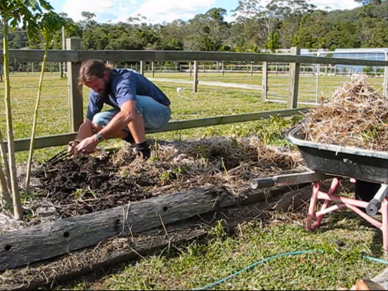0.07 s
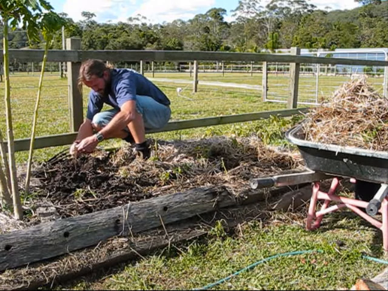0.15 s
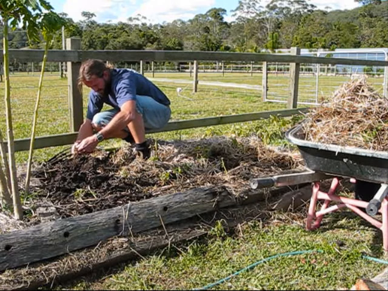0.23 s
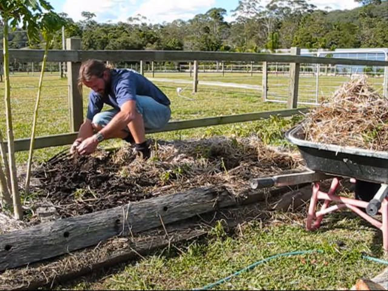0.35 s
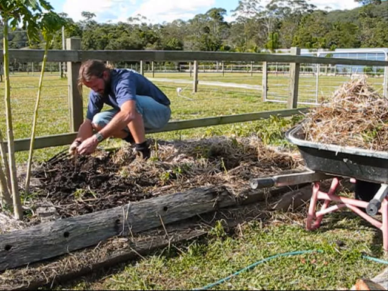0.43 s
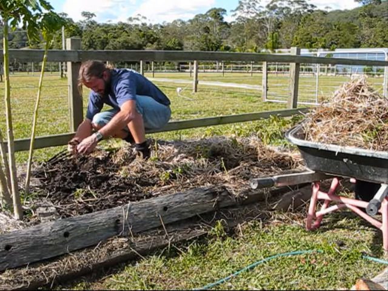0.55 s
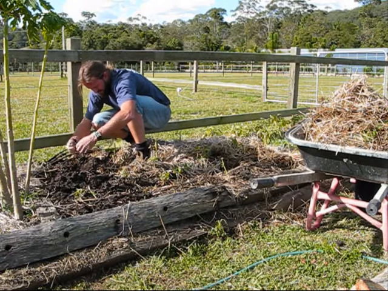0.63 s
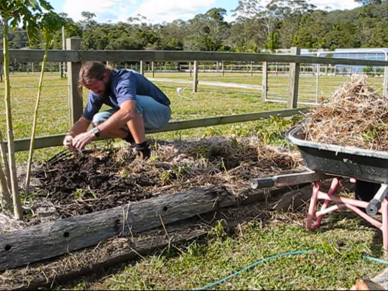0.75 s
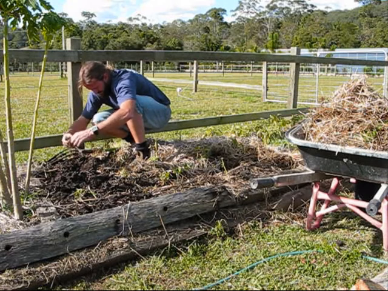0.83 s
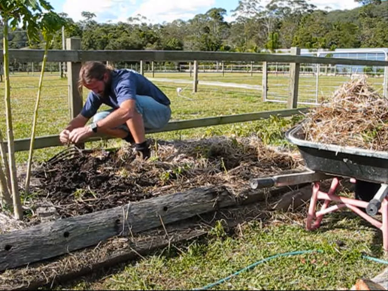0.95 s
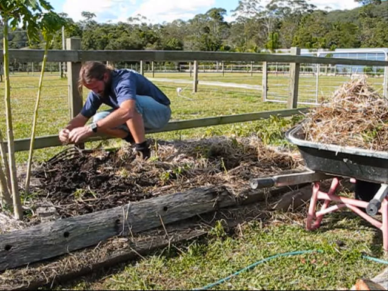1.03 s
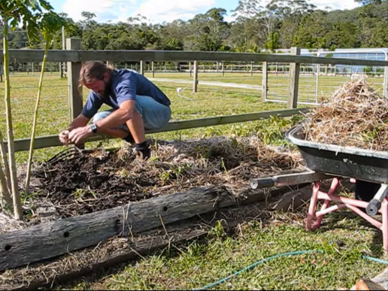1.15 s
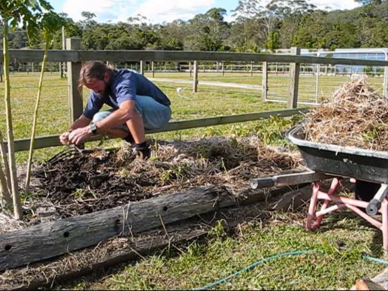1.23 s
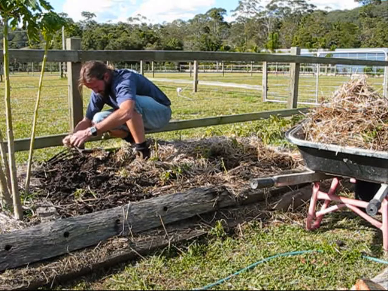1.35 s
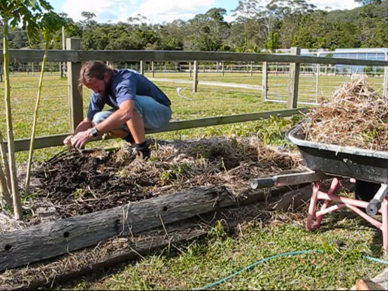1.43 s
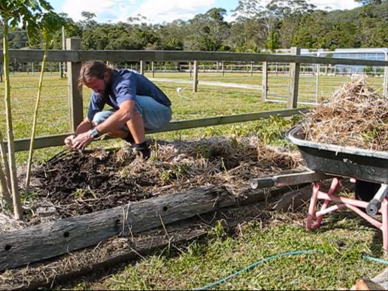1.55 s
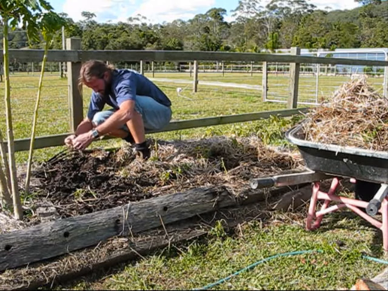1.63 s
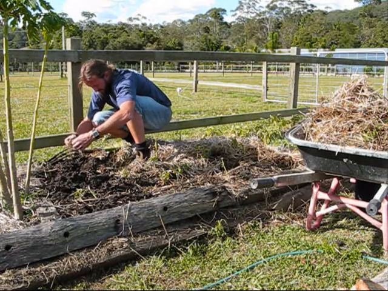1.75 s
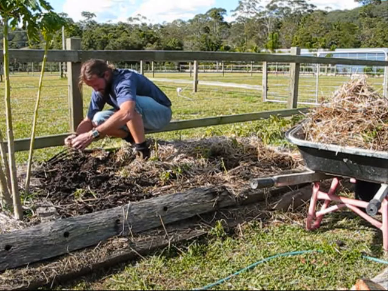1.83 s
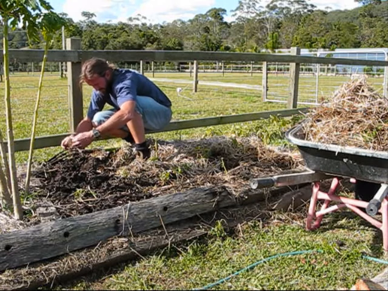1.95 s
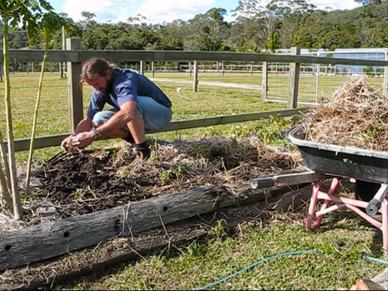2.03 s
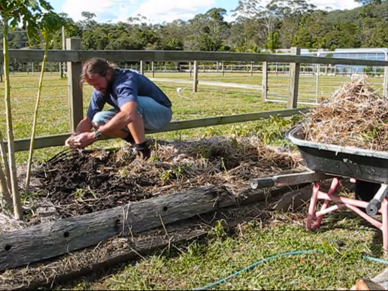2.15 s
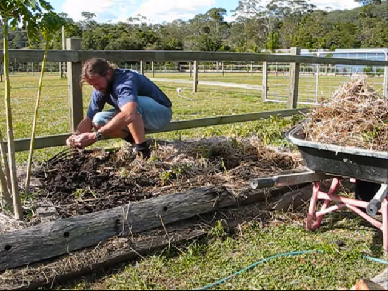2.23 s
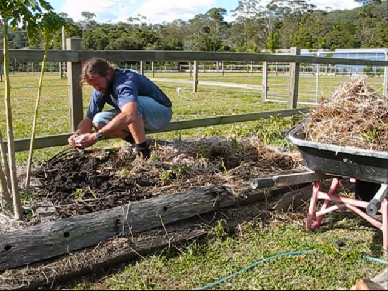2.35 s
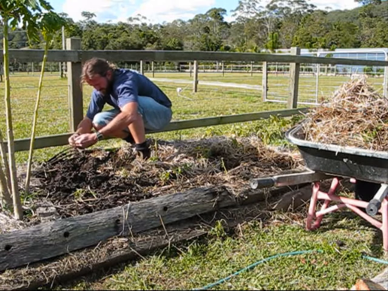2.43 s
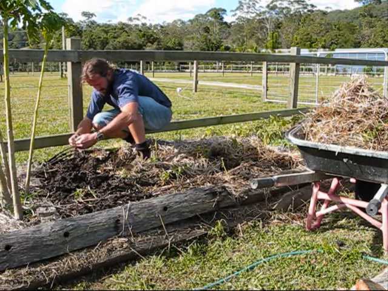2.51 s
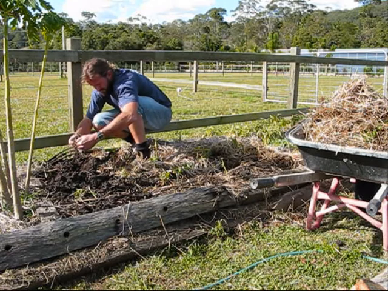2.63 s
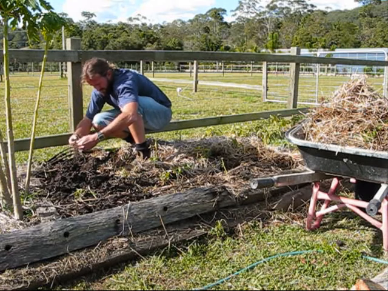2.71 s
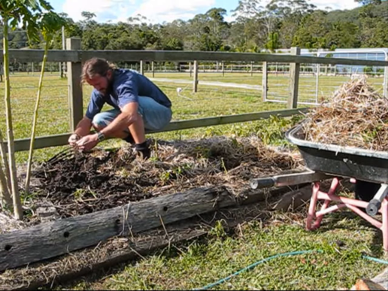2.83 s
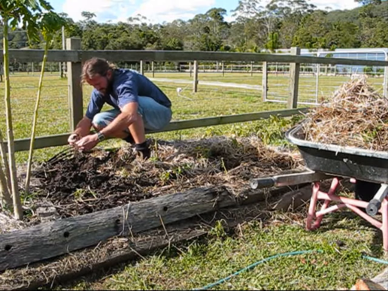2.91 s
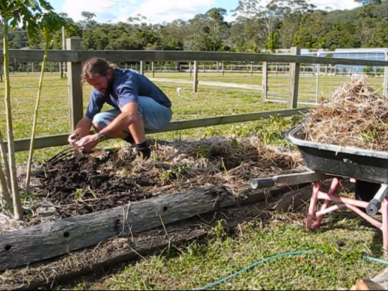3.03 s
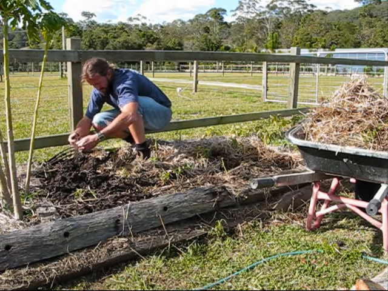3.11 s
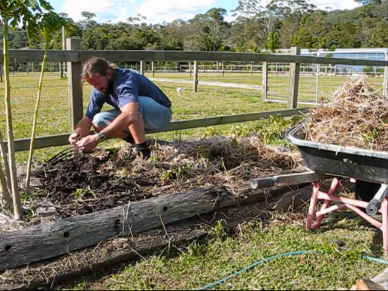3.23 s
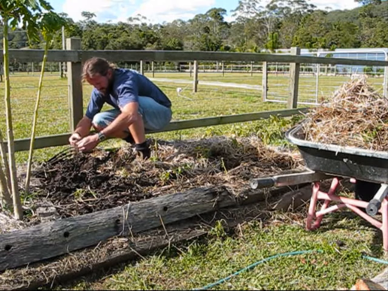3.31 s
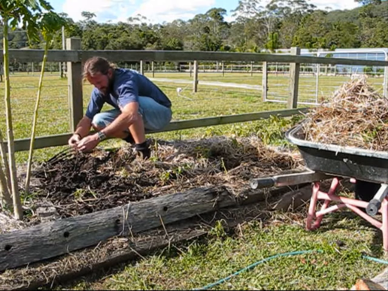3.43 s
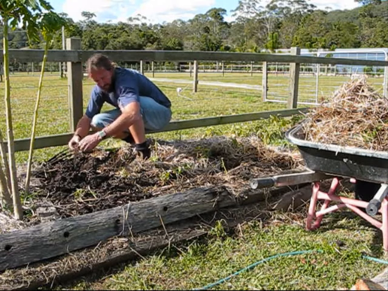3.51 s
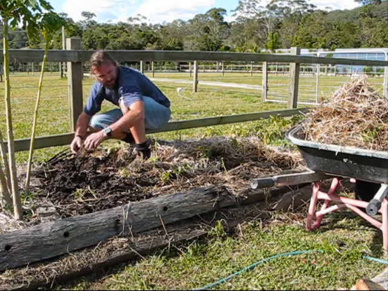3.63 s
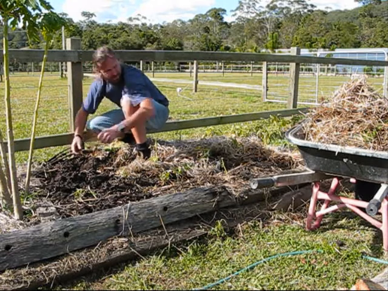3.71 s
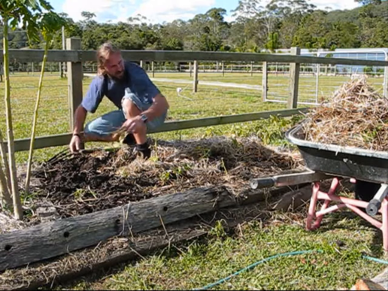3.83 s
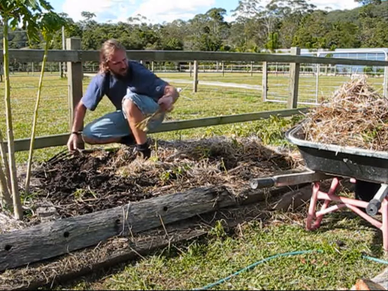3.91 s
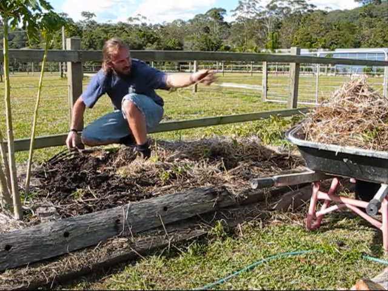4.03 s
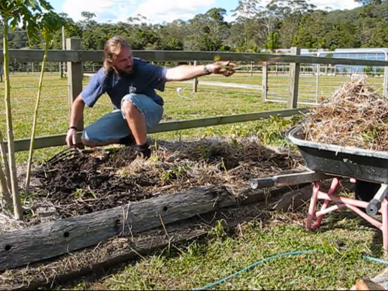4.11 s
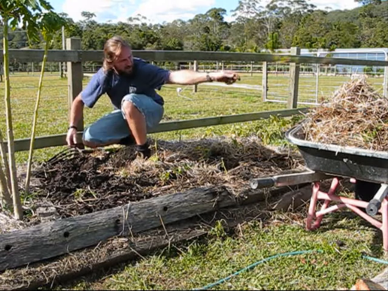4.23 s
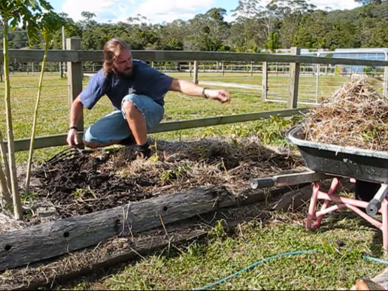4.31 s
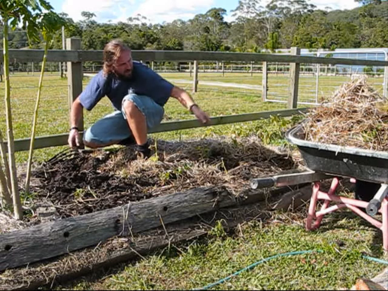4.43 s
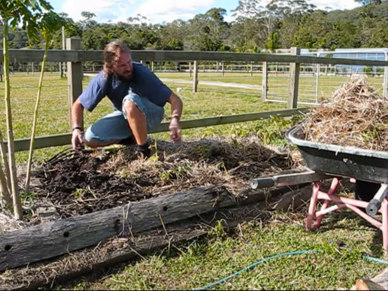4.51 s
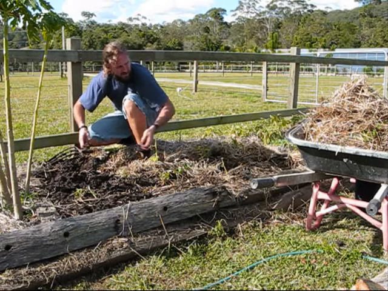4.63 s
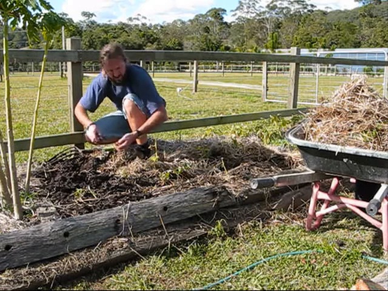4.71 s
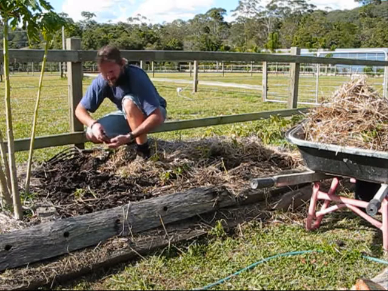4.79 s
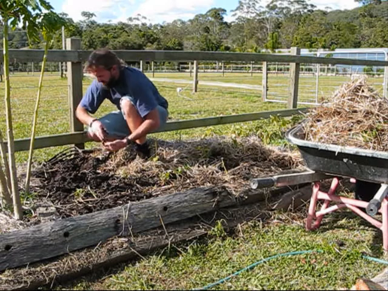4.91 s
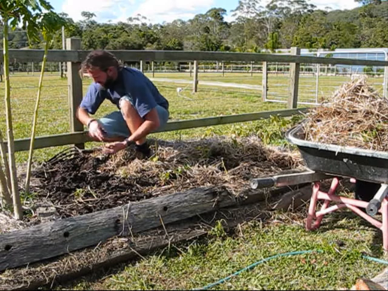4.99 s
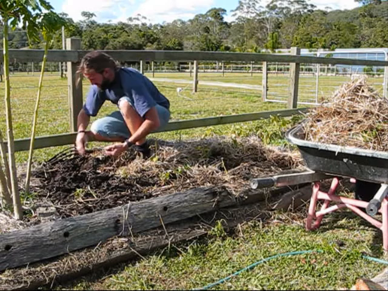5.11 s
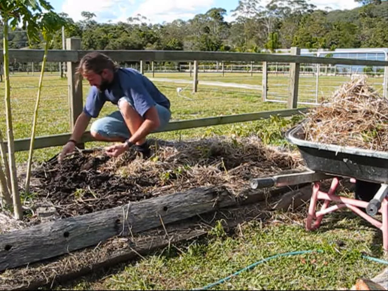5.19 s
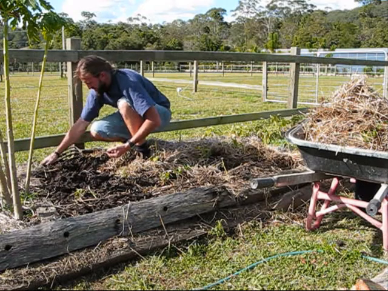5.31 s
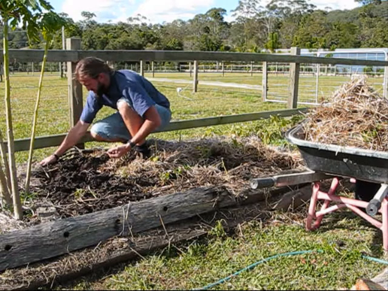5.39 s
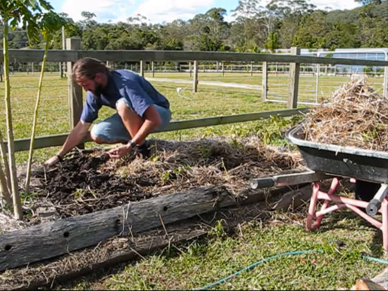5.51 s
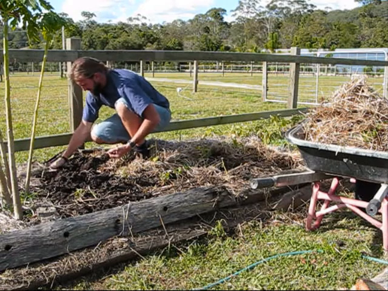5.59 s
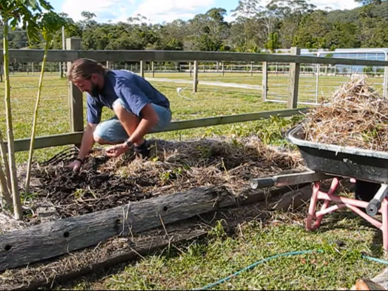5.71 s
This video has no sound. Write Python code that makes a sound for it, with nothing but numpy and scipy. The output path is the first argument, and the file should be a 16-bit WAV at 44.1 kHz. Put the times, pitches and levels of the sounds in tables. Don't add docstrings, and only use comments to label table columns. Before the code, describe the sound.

Dry straw rustles and stalks snap in working hands; a thrown handful lands with a loud crackle over open-air hiss, cicada drone and a brief parrot squeak.

```python
import sys
import numpy as np
from scipy import signal
from scipy.fft import rfft, irfft, next_fast_len
from scipy.io import wavfile
from scipy.ndimage import map_coordinates

SR = 44100
rng = np.random.default_rng(int(sys.argv[2]) if len(sys.argv) > 2 else 0)


def gain_from_db(level_db):
    decades = np.asarray(level_db, float) / 20
    return 10 ** decades


def transcribe(u):
    v = np.clip(np.atleast_2d(u).T, -1, 1)
    q = np.round(v * 32767).astype(np.int16)
    wavfile.write(sys.argv[1], SR, q)


N = 253575

# frequency in Hz, level in dB per Hz.
AIR_SPECTRUM = [(15, -35), (25, -6.5), (70, -3.5), (300, -3.5), (700, -3), (1200, -5.5), (2000, -8),
                (4500, -13), (7300, -15.5), (7800, -14), (9200, -14), (9900, -18.5), (13000, -22.5),
                (16500, -25)]
AIR_DB = -48
HUM_HZ, HUM_DB = 82, -67.5

# start in seconds, second wind in seconds, cut in seconds,
# belly level in dB, level in dB of the neighbours left after the cut.
CICADA_PHRASES = [
    (-.05, .75, 1.24, -57, -72),
    (1.7, 2.7, 2.963, -59, -63),
    (3.9, 4.8, 5.243, -60, -64),
    (5.75, 6.6, 7, -59, -65),
]
DRUM_LOW_HZ, DRUM_HIGH_HZ, DRUM_AFTER_HZ = 8100, 8690, 8480
CLIMB = .75
FRESH_PER_S, TIRED_PER_S, SPENT_PER_S = 125, 114, 106
RECOVER_S = .22
DRUM_START_DB, SWELL_DB, DRUM_DB = -72, -61, -54
SWELL_SHARE = .38
BELLY_HZ, BELLY_START_DB = 7880, -5

# frequency in Hz, level in dB per Hz.
CHAFF_SPECTRUM = [(5000, -33), (8000, -5.5), (11000, -2), (13500, 0.5), (15200, -1.5), (16500, -8)]
# frequency in Hz, level in dB per Hz.
STALK_SPECTRUM = [(600, -40), (1300, -10.5), (2600, -1.5), (5000, 0), (7500, -1.5), (11000, -32)]
# peak in seconds, level in dB, seconds to rise 10 dB,
# seconds to fall 10 dB, coarse stalks over fine chaff in dB.
HAND_STROKES = [(.3, -68, 1, 1, -8), (1.45, -69, .2, .4, -6), (2.05, -64, .4, .25, -10),
                (2.8, -68, .8, .7, -11), (3.63, -55, .09, .6, -.5), (3.92, -54, .25, .25, -2),
                (4.34, -57, .12, .2, -4), (4.47, -39, .012, .04, -7), (4.507, -31.5, .04, .078, -6.8),
                (4.65, -43, .07, .11, -6.5), (4.7505, -36.5, .002, .009, -5), (4.85, -48, .15, .2, -6.5),
                (5.2, -57, .3, .2, -3), (5.46, -49.5, .09, .12, -4), (5.57, -55, .1, .1, -4),
                (5.7, -42.5, .085, .08, -7)]
FALL_SHAPE = 1.4

# start in seconds, peak in dB, body over peak in dB.
STALK_SNAPS = [(0.0417, -41, -8), (0.3131, -43, -13), (0.9222, -45, -5), (1.4166, -37, -16),
               (1.5029, -35, -8), (1.5854, -45, -10), (1.7992, -38, -13), (1.9633, -42, -8),
               (1.9963, -36.5, -15), (2.0841, -45, -9), (2.134, -34, -12), (3.5955, -32, -17),
               (3.7703, -40, -7), (3.8144, -37, -9), (3.9468, -30, -3.5), (4.1658, -41, -7),
               (4.329, -39, -12),
               (4.4507, -32, -12), (4.4645, -23, -10), (4.481, -28, -7), (4.5004, -27, -18),
                (4.5064, -19, -13), (4.5504, -20, -14), (4.5652, -13.5, -4.5), (4.569, -25, -4),
                (4.5754, -29, -12), (4.591, -26, -9), (4.6107, -15.5, -12), (4.9754, -40, -3),
                (5.0566, -36, -9), (5.0876, -39, -12), (5.1012, -32, -15), (5.1576, -38, -7),
                (5.2299, -40, -7), (5.2903, -39, -12), (5.3831, -41, -8), (5.405, -31, -15),
                (5.428, -38, -13), (5.4502, -25.5, -10), (5.5094, -41, -5), (5.5313, -38, -5),
                (5.675, -31, -14)]
SNAP_T60_S = .011
THICK_DB, THICK_RINGS = -19, .05

# frequency in Hz, gain in dB.
THROAT = [(1500, -34), (2000, -2.5), (2700, -1), (3600, -2), (5300, 0.5), (6500, -12), (7500, -22),
          (10500, -13), (12300, -28), (13500, -21), (15500, -34)]
# start in seconds, length in seconds, from Hz, to Hz, level in dB.
CLEAR_SYLLABLES = [
    (0.465, .018, 2040, 2190, -44),
    (.482, .019, 2210, 2420, -39.5),
    (0.607, 0.0228, 2177, 1976, -41.5),
    (0.629, .017, 1990, 2014, -44),
    (.645, 0.011, 2040, 2100, -48),
]
# start in seconds, length in seconds, from Hz, to Hz, level in dB.
HUSKY_SYLLABLES = [
    (0.429, .022, 2400, 2400, -50),
    (0.446, 0.021, 2340, 2050, -47),
    (0.548, 0.0038, 2540, 2740, -34),
    (0.572, 0.0197, 2330, 2346, -40),
    (0.589, 0.015, 3310, 3340, -41),
]
# start in seconds, length in seconds, from Hz, to Hz, level in dB.
HARSH_SYLLABLES = [
    (.5225, 0.0085, 2800, 2790, -37),
    (0.5532, 0.0046, 2640, 2760, -32.5),
    (0.5577, 0.0077, 2760, 2690, -35),
    (0.563, .009, 2650, 2560, -36.5),
]
# start in seconds, length in seconds, from Hz, to Hz, level in dB.
BROKEN_SYLLABLES = [
    (.572, .012, 3500, 3200, -44),
    (0.599, 0.015, 2500, 2180, -41.5),
]
RASP = (.15, .32, .42, .9)
# frequency in Hz, level in dB.
BUZZ_PARTIALS = [(2681, -54), (3585, -41), (4490, -42), (5378, -52), (6277, -56), (8947, -63), (9857, -60),
                 (10745, -58), (11649, -60), (14300, -66)]
BUZZ_START_S, BUZZ_LENGTH_S = .498, 0.029

# start in seconds, length in seconds, from Hz, to Hz, level in dB.
HOOKS = [
    (2.329, .095, 5400, 4680, -60.5),
    (2.685, .095, 5550, 5150, -60),
    (3.07, .06, 4600, 4500, -65),
    (5.405, 0.095, 5300, 4900, -57.5),
]
# start in
# seconds, length in seconds, from Hz, to Hz, level in dB.
GLIDES = [(.83, .03, 1800, 2480, -60), (0.856, .075, 2540, 2080, -54.5), (4.165, .012, 4200, 3900, -55),
          (4.974, 0.0074, 5150, 4150, -49), (5.155, .02, 4200, 4210, -58), (5.174, .026, 2980, 3800, -50),
          (5.195, .017, 4400, 4250, -51), (5.208, 0.039, 3195, 3800, -52), (5.243, .03, 4520, 4760, -63),
          (5.493, 0.026, 2220, 2140, -56.5), (3.69, .03, 2300, 3900, -60)]
HOOK_HALFWAY, GLIDE_HALFWAY = 1.25, .48

MIC_TOP_HZ = 15780


def unit(x):
    return x / np.sqrt(np.mean(x ** 2) + 1e-20)


def curves(rows):
    s, *columns = np.transpose(rows)
    return [np.interp(np.arange(N) / SR, s, column) for column in columns]


def gain(points, hz):
    f, db = np.transpose(points)
    return gain_from_db(np.interp(np.log(hz + 1), np.log(f), db))


def noise(points):
    m = next_fast_len(N + 8192)
    spectrum = rfft(rng.standard_normal(m)) * gain(points, np.fft.rfftfreq(m, 1 / SR))
    return unit(irfft(spectrum, m)[:N])


def wobble(rate):
    knots = rng.standard_normal(int(N * rate / SR) + 4)
    return map_coordinates(knots, [np.arange(N) * rate / SR])


def tone(hz):
    return np.sin(np.cumsum(2 * np.pi * hz / SR))


def add(track, s, sound):
    part = track[round(s * SR):][:len(sound)]
    part += sound[:len(part)]


def air():
    hum = tone(HUM_HZ * (1 + 0.0304 * wobble(6)))
    hiss_gain = gain_from_db(AIR_DB + 0.31 * wobble(1.47) + 0.15 * wobble(8))
    hum_gain = gain_from_db(HUM_DB + 1.5 + 1.6 * wobble(3.96))
    return hiss_gain * noise(AIR_SPECTRUM) + hum_gain * hum


def phrases():
    pitch, pace, level = [], [], []
    for start, wind, cut, belly_db, after_db in CICADA_PHRASES:
        length, gone = cut - start, cut + .007
        for u in np.linspace(0, 1, 6):
            pitch.append((start + u * length, DRUM_LOW_HZ + (DRUM_HIGH_HZ - DRUM_LOW_HZ) * u ** CLIMB))
        pitch.append((gone, DRUM_AFTER_HZ))
        pace += [(start, FRESH_PER_S), (wind - RECOVER_S, TIRED_PER_S)]
        pace += [(wind, FRESH_PER_S), (cut, SPENT_PER_S)]
        level += [(start, DRUM_START_DB, belly_db + BELLY_START_DB),
                  (start + SWELL_SHARE * length, SWELL_DB, belly_db),
                  (cut, DRUM_DB, after_db + 1.5),
                  (gone, after_db, after_db - 4)]
    return curves(pitch) + curves(pace) + curves(level)


def cicada():
    hz, rate, drum_db, belly_db = phrases()
    beat = np.cumsum(rate * (1 + 0.018 * wobble(25)) / SR) % 1
    pulse = np.sin(np.pi * np.clip(beat / .8, 0, 1) ** .75) ** 1.2
    drum = tone(hz * (1 + .11 * (.35 - beat) + .003 * wobble(120)))
    belly = noise([(BELLY_HZ - 500, -30), (BELLY_HZ - 150, 0), (BELLY_HZ + 200, 0), (BELLY_HZ + 600, -30)])
    drumming = gain_from_db(drum_db + 1.6 * wobble(60)) * unit(pulse * drum)
    return drumming + gain_from_db(belly_db) * unit((pulse + 0.37) * belly)


def strokes():
    s, db, rise, fall, stalk_db = np.transpose(HAND_STROKES)[..., None]
    late = np.arange(N) / SR - s
    swell_db = 10 * (np.maximum(-late, 0) / rise) ** 2
    fade_db = 10 * (np.maximum(late, 0) / fall) ** FALL_SHAPE
    power = gain_from_db(db - swell_db - fade_db) ** 2
    return np.sqrt(power.sum(axis=0)), np.sqrt((power * gain_from_db(stalk_db) ** 2).sum(axis=0))


def crackle(per_s, spread_db, t60):
    sizes = gain_from_db(spread_db * np.minimum(rng.exponential(size=N), 4))
    hits = (rng.random(N) < per_s / SR) * sizes
    power = signal.lfilter([1], [1, -gain_from_db(-120 / (t60 * SR))], hits ** 2)
    return unit(np.sqrt(power + 0.78))


def straw():
    chaff, stalk = strokes()
    cracks = crackle(per_s=900, spread_db=2.6, t60=.004)
    return cracks * (chaff * noise(CHAFF_SPECTRUM) + stalk * noise(STALK_SPECTRUM))


def snaps():
    fine, body, t = np.zeros(N), np.zeros(N), np.arange(SR // 10) / SR
    for s, db, body_db in (*STALK_SNAPS,):
        t60 = SNAP_T60_S * (1 + THICK_RINGS * gain_from_db(db + body_db - THICK_DB))
        rise = 1 - np.exp(-(t / (0.06 * t60)) ** 2)
        add(fine, s, gain_from_db(db - 1.0 - 60 * t / t60) * rise)
        add(body, s, gain_from_db(db + 1 + body_db - 60 * t / (1.62 * t60)) * rise)
    return fine * noise(CHAFF_SPECTRUM) + body * noise(STALK_SPECTRUM)


def syllable(length, hz0, hz1, db, rasp, shake, flutter):
    u = np.linspace(0, 1, length)
    hz = (hz0 + (hz1 - hz0) * u) * (1 + 0.095 * rasp * shake)
    phase = np.cumsum(2 * np.pi * hz / SR)
    bright_db = 0.12 * (db + 41)
    stack = np.zeros(length)
    for k in range(2, int(46000 / hz0)):
        strength = (.9 * rasp if k % 3 else 1) * gain_from_db(bright_db * k)
        stack += strength * gain(THROAT, k * hz / 3) * np.sin(k * phase / 3 + k * k)
    return gain_from_db(db + 4.1 * rasp * flutter) * unit(stack) * np.clip(9 * u * (1 - u), 0, 1)


def parrot_buzz():
    t = np.arange(round(BUZZ_LENGTH_S * SR)) / SR
    u = t / t[-1]
    drift = np.cumsum(1 + .012 * wobble(200)[:len(t)]) / SR
    buzz = np.zeros(len(t))
    for k, (hz, db) in enumerate(BUZZ_PARTIALS):
        flutter = gain_from_db(2.5 * wobble(150)[:len(t)])
        buzz += gain_from_db(db + 3.5) * flutter * np.sin(2 * np.pi * hz * drift + k * k)
    return buzz * np.clip(7 * u * (1 - u), 0, 1)


def parrot():
    out, shake, flutter = np.zeros(N), wobble(900), wobble(500)
    voices = (CLEAR_SYLLABLES, HUSKY_SYLLABLES, HARSH_SYLLABLES, BROKEN_SYLLABLES)
    for voice, rasp in zip(voices, RASP):
        for s, length_s, hz0, hz1, db in voice:
            start, length = round(s * SR), round(length_s * SR)
            here = slice(start, start + length)
            add(out, s, syllable(length, hz0, hz1, db, rasp, shake[here], flutter[here]))
    add(out, BUZZ_START_S, parrot_buzz())
    return out


def far_birds():
    out, quaver = np.zeros(N), 1 + .006 * wobble(300)
    for calls, halfway in ((HOOKS, HOOK_HALFWAY), (GLIDES, GLIDE_HALFWAY)):
        for s, length, hz0, hz2, db in calls:
            hz1 = hz0 + halfway * (hz2 - hz0)
            u = np.linspace(-1, 1, round(length * SR))
            hz = hz1 + (hz2 - hz0) / 2 * u + ((hz0 + hz2) / 2 - hz1) * u ** 2
            whistle = tone(hz * quaver[round(s * SR):][:len(u)])
            add(out, s, gain_from_db(db + 4.0) * whistle * np.sqrt(1 - u ** 2))
    return out * gain_from_db(1.8 * wobble(90))


def garden(x):
    t = np.arange(SR // 5) / SR
    tail = rng.standard_normal(len(t)) * gain_from_db(-60 * t / 0.14) * (t > .003)
    return signal.fftconvolve(x, tail / np.linalg.norm(tail))[:N]


def scene():
    scattered = parrot() + far_birds() + snaps()
    mono = scattered + gain_from_db(-9) * garden(scattered) + straw() + cicada() + air()
    return np.array([mono, mono])


def low_pass(x):
    return signal.sosfilt(signal.butter(12, 17000, fs=SR, output="sos"), x)


def record(dry):
    heard = rfft(dry) * (np.fft.rfftfreq(N, 1 / SR) < MIC_TOP_HZ)
    mix = irfft(heard, N)
    return low_pass(mix)


dry = scene()
out = record(dry)
transcribe(out)
```